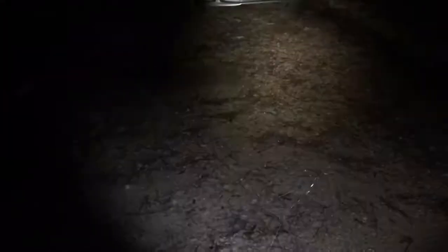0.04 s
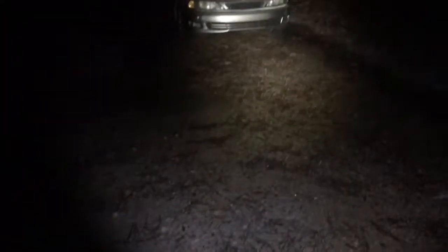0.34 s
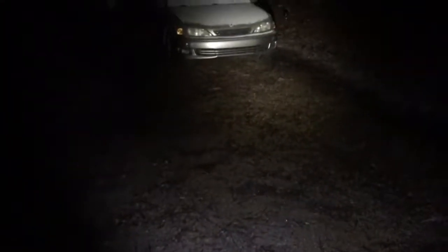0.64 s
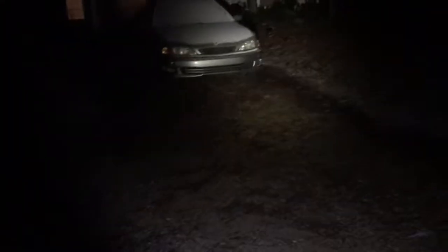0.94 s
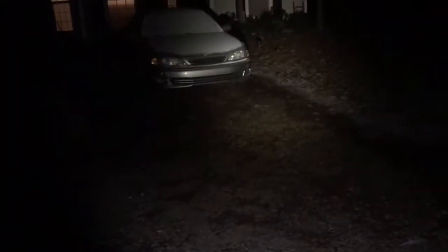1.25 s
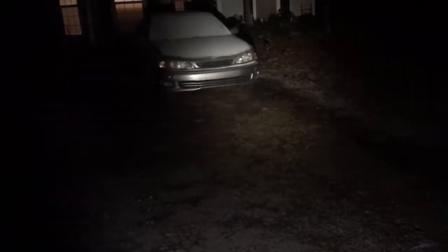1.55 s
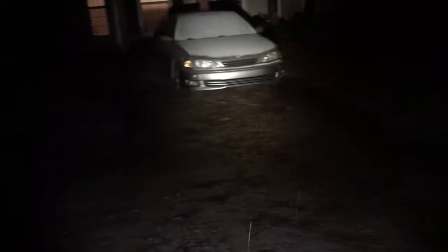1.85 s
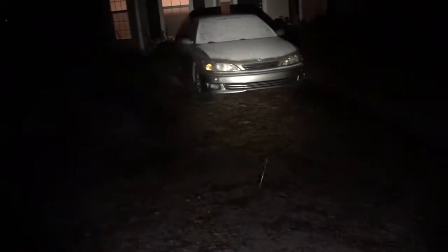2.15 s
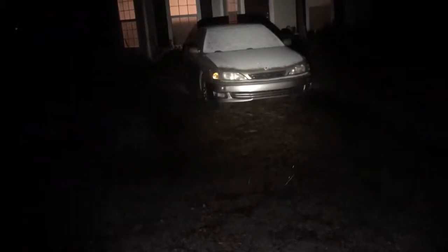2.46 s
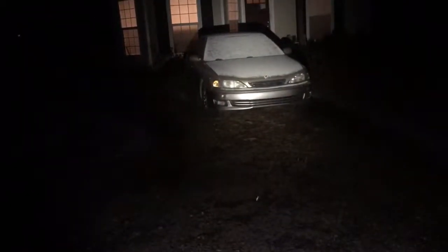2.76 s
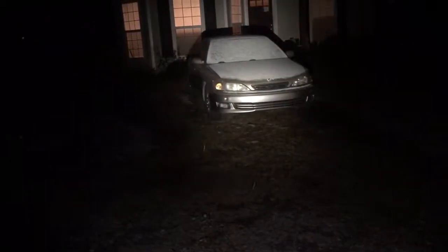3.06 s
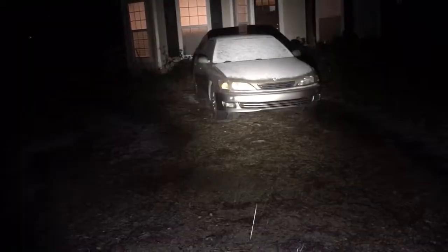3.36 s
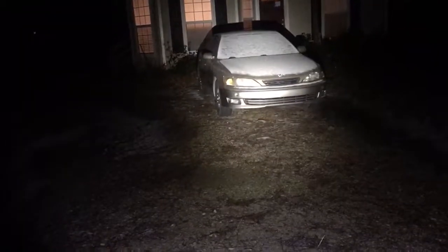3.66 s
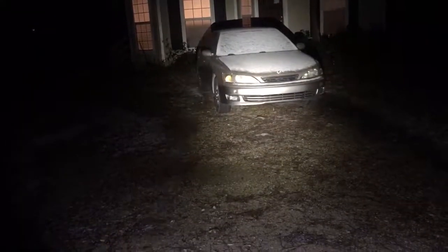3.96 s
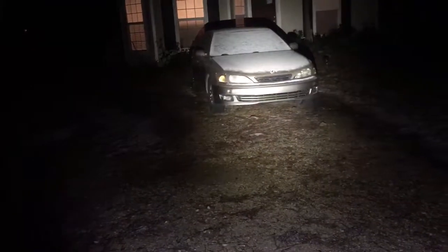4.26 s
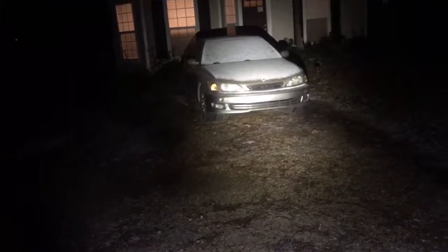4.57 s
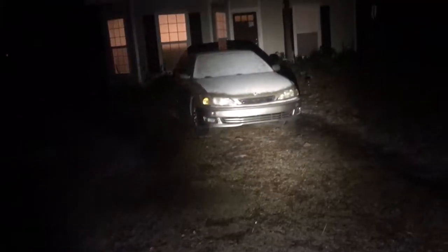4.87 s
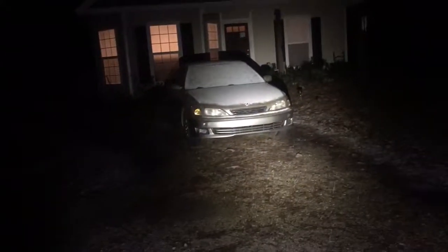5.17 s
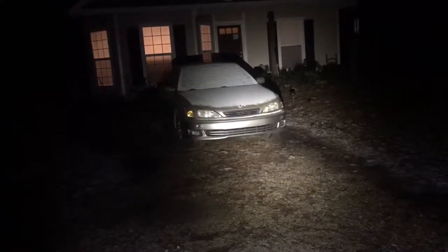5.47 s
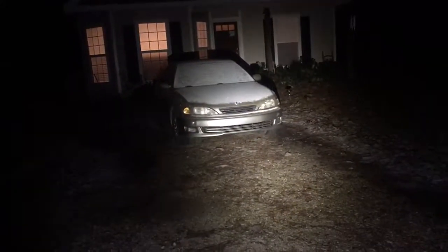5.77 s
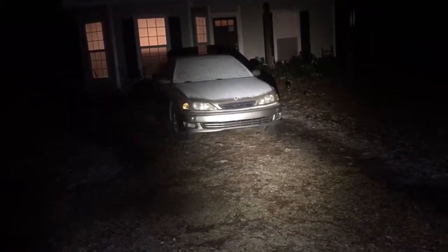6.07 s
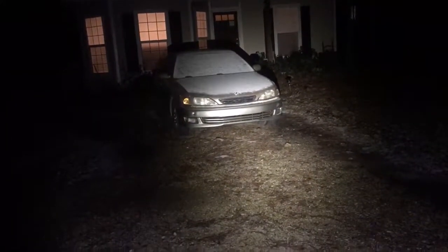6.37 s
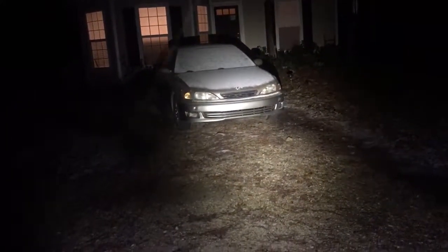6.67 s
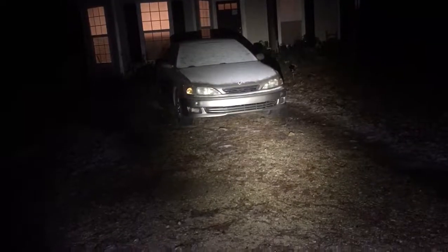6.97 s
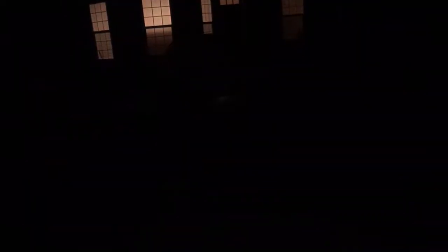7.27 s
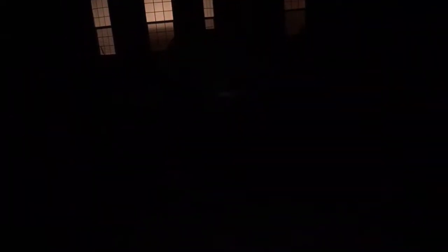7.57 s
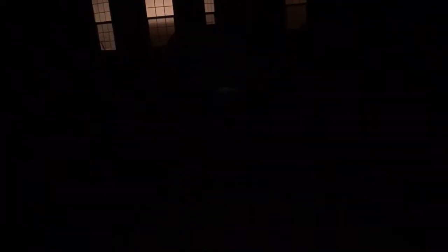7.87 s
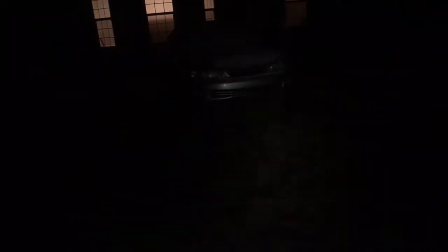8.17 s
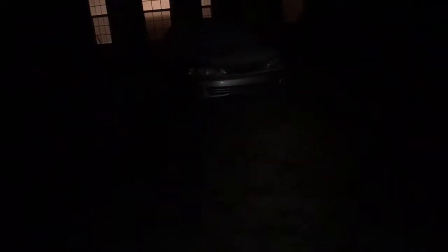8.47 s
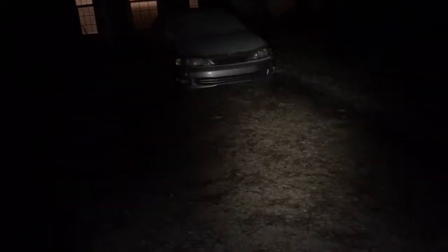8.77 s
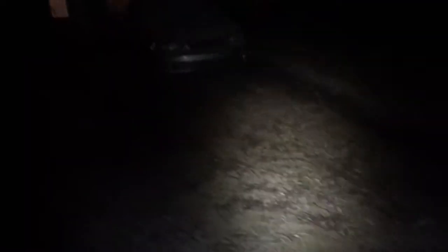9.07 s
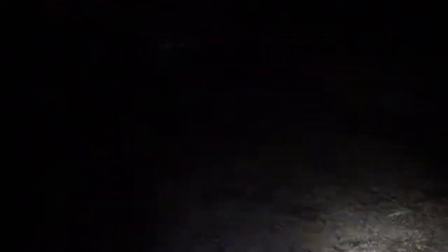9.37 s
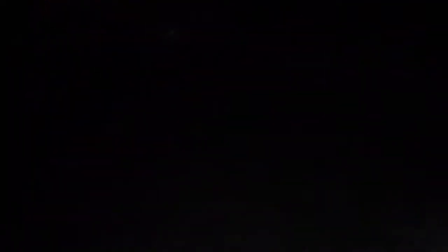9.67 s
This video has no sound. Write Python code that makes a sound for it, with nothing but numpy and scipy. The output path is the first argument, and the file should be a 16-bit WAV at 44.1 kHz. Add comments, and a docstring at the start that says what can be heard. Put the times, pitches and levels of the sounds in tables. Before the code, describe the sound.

Ice pellets patter outdoors in a bright, continuous hiss, over light wind and very faint distant traffic.

```python
"""A gravel drive and a lawn at night, under steady sleet.
Countless ice pellets merge into a bright sizzle. Nearer ones patter and tick, each a pressure swing
of a few cycles, and a few heavy drops pat dully on something soft close by. Eddies of light wind
rumble underneath, with a faint far drone of engines and tyres. The sound is mono."""
import sys
import numpy as np
from scipy import signal
from scipy.fft import rfft, irfft, next_fast_len
from scipy.io import wavfile

SR = 44100
rng = np.random.default_rng(int(sys.argv[2]) if len(sys.argv) > 2 else 0)


def store_pcm(level_fs):
    """Save levels as 16-bit WAV."""
    pcm = np.round(np.clip(level_fs, -1, 1) * 32767).astype(np.int16)
    wavfile.write(sys.argv[1], SR, np.atleast_2d(pcm).T)


N = 428652


def from_db(db):
    """Decibels to gain."""
    return 10 ** (np.asarray(db) / 20)


def unit_rms(x):
    """Scale to rms 1."""
    return x / np.sqrt(np.mean(x ** 2) + 1e-20)


def curve(rows):
    """Interpolate (seconds, value) rows to one value a sample."""
    return np.interp(np.arange(N) / SR, *np.transpose(rows))


def drift(rate_hz):
    """Smooth random motion, rms about 1."""
    hop, warmup = 40, 2000
    pole = np.exp(-2 * np.pi * hop * rate_hz / SR)
    noise = rng.standard_normal(N // hop + warmup + 2)
    slow = signal.lfilter([1], [1, -2 * pole, pole * pole], noise)[warmup:]
    return np.interp(np.arange(N) / hop, np.arange(len(slow)), unit_rms(slow))


def coloured(x, spectrum, notches=()):
    """Shape x with a minimum-phase filter; rms 1."""
    size = 2 * next_fast_len(N // 2 + 1)
    hz = np.maximum(np.fft.rfftfreq(size, 1 / SR), 1)
    points_hz, points_db = np.transpose(spectrum)
    db = np.interp(np.log(hz), np.log(points_hz), points_db)
    for centre_hz, width_hz, gain_db in notches:
        db += gain_db / (1 + (2 * (hz - centre_hz) / width_hz) ** 2)
    cepstrum = irfft(np.log(from_db(db)))
    response = np.exp(rfft(2 * cepstrum[:size // 2], size))
    return unit_rms(irfft(rfft(x, size) * response)[:N])


def impacts(rows):
    """Each impact is a pressure swing that swells and dies within a few cycles."""
    out, t = np.zeros(N), np.arange(SR // 20) / SR
    for start_s, db, hz, rise_cycles in rows:
        start = int(np.clip(start_s * SR, 0, N - 1))
        age = t * hz / max(rise_cycles, 0.1)
        envelope = age * np.exp(1 - np.minimum(age, 40))
        swing = -np.sin(2 * np.pi * hz * t) * envelope
        out[start:start + len(t)] += from_db(db) * swing[:N - start]
    return out


def spatter(rows, decay_s, band_hz):
    """Fragments fly from each impact: a noise burst that dies in milliseconds."""
    kicks = np.zeros(N)
    for start_s, db in rows:
        kicks[int(np.clip(start_s * SR, 0, N - 1))] += from_db(db)
    envelope = signal.lfilter([1], [1, -np.exp(-1 / (decay_s * SR))], kicks + 1e-18)
    band = signal.butter(2, band_hz, "band", fs=SR, output="sos")
    return envelope * unit_rms(signal.sosfilt(band, rng.standard_normal(N)))


# Far engine notes. Each row: peak time in seconds, level in dB, pitch in Hz, fade in seconds.
ENGINE_SWELLS = [(0.1, -60, 131, 0.46), (1.05, -55.5, 168.8, 0.22), (1.95, -53.5, 130.5, 0.76),
                 (3.6, -66, 171, 0.63), (5.0, -59.5, 130.7, 1.5), (8.15, -57.5, 168.5, 0.55),
                 (8.25, -57, 132, 0.23), (9.3, -62, 133.6, 0.71)]

def engines(t, waver_hz=1.99, throb_db=1.1):
    """Far engines swell and fade, wavering in pitch and level on their way through the air."""
    out = np.zeros(N)
    for peak_s, db, hz, fade_s in ENGINE_SWELLS:
        phase = 2 * np.pi * np.cumsum(hz + waver_hz * drift(4.9)) / SR
        note = unit_rms(np.sin(phase) * from_db(throb_db * drift(6.1)))
        out += from_db(db) * np.exp(-((t - peak_s) / fade_s) ** 2) * note
    return out


# Tyre noise spectrum. Each row: frequency in Hz, relative density in dB.
TYRE_SPECTRUM = [(88, -30.5), (150, -5), (220, -3.5), (310, -7.5), (405, -7), (520, -10), (660, -7.5),
                 (900, -13.5), (1300, -17), (1690, -19), (2860, -120)]
# Tyre noise over time. Each row: time in seconds, level in dB.
TYRE_LEVEL = [(0, -58.5), (1.8, -59), (4.7, -58), (6.5, -60.5), (8.7, -59.5), (9.2, -55.5), (9.72, -54)]

def tyres():
    """Tyres on a far road blend into a dull wash."""
    return from_db(curve(TYRE_LEVEL)) * coloured(rng.standard_normal(N), TYRE_SPECTRUM)


# Wind rumble spectrum. Each row: frequency in Hz, relative density in dB.
WIND_SPECTRUM = [(15, -42), (28, -21), (44, -1), (68, 1), (102, -6.5), (136, -4), (195, -16.5), (300, -23),
                 (420, -38), (660, -102)]
# Gusts. Each row: peak time in seconds, rise over the breeze in dB.
GUST_PEAKS = [(0.06, 9), (0.62, 7), (0.87, 3), (1.22, 10), (2.22, 9), (7.68, 11), (8.28, 10), (8.97, 5),
              (9.67, 8)]

def wind(t, breeze_db=-55.0, fresh_db=8.5, calming_s=1.63, lump_db=2.0, attack_s=0.037, release_s=0.03):
    """Eddies give a lumpy rumble that calms to a breeze; short gusts rise out of it."""
    gust_db = sum(db * np.exp(-np.maximum((peak_s - t) / attack_s, (t - peak_s) / release_s))
                  for peak_s, db in GUST_PEAKS)
    level_db = breeze_db + fresh_db * np.exp(-t / calming_s) + gust_db + lump_db * drift(7.7)
    return from_db(level_db) * coloured(rng.standard_normal(N), WIND_SPECTRUM)


def pellet_grains(per_band_per_s, spread_db, flutter_db, bands=9):
    """Dense pellet clicks, most weak, a few strong; each pitch band has its own flurries."""
    out, edges_hz = np.zeros(N), np.geomspace(2200, 16500, bands + 1)
    for band_hz in zip(edges_hz, edges_hz[1:]):
        hits = np.flatnonzero(rng.random(N) < per_band_per_s / SR)
        hit_db = spread_db * np.minimum(rng.exponential(1, len(hits)), 4)
        clicks = np.zeros(N)
        clicks[hits] = from_db(hit_db) * rng.choice([-1, 1], len(hits))
        band = signal.butter(1, band_hz, "band", fs=SR, output="sos")
        out += signal.sosfilt(band, unit_rms(clicks) + 1e-18) * from_db(flutter_db * drift(40))
    return unit_rms(out)


# Tone of the sleet sizzle as picked up, with a bright microphone resonance near 6.1 kHz.
# Each row: frequency in Hz, relative gain in dB.
SIZZLE_SPECTRUM = [(530, -40), (900, -25), (1330, -20), (2150, -13), (2670, -16.5), (4400, -7), (4840, -7),
                   (5590, 0), (6080, 1), (6530, 0), (7710, -9.5), (9450, -11.5), (10400, -15.5),
                   (15100, -18), (15600, -16)]
# Narrow dips in that tone. Each row: centre in Hz, width in Hz, gain in dB.
SIZZLE_NOTCHES = [(4950, 180, -4), (10310, 900, -3)]

def sizzle(t, start_db=-37.5, thinning_db_per_s=0.195, flurry_db=0.73, hiss_db=-1.5, grain_db=-3.5):
    """Far pellets blur into hiss, closer ones stay grains; the fall flurries and slowly thins."""
    grains = from_db(grain_db) * pellet_grains(per_band_per_s=1000, spread_db=3.5, flutter_db=0.97)
    hiss = from_db(hiss_db) * rng.standard_normal(N)
    level_db = start_db - thinning_db_per_s * t + flurry_db * drift(38)
    return from_db(level_db) * coloured(hiss + grains, SIZZLE_SPECTRUM, SIZZLE_NOTCHES)


def patter(per_s, level_db, spread_db, centre_hz, spread_octaves, rise_cycles, bunch_db):
    """Pellets hit one surface in loose bunches: ticks of varied size and pitch."""
    landed = np.cumsum(per_s * from_db(bunch_db * drift(6))) / SR
    jitter, size, pitch, ring = rng.uniform(-1, 1, (3000, 4)).T
    # A pellet lands when the running count reaches its turn.
    turn = np.arange(len(jitter)) + 2 * jitter
    start_s = np.interp(turn, landed, np.arange(N) / SR, left=-1, right=-1)
    db = level_db + spread_db * size
    hz = centre_hz * 2 ** (spread_octaves * pitch)
    cycles = rise_cycles * 2 ** (0.65 * ring)
    return impacts(np.transpose([start_s, db, hz, cycles])[start_s >= 0])


# Flurries a few steps away. Each row: time in seconds, base rate in pellets per second.
FALL_RATE = [(0, 72), (1.3, 63.2), (2.1, 19.8), (2.9, 26.5), (3.7, 73.8), (5.6, 108.3), (7.4, 52),
             (8.8, 49.8), (9.3, 83)]

def ground_patter(close_share=0.15, gravel_share=0.6, mud_share=0.25):
    """One rate of fall drives the patter on every surface."""
    per_s = curve(FALL_RATE)
    underfoot = patter(close_share * per_s, level_db=-32.5, spread_db=3.0,
                       centre_hz=2220, spread_octaves=0.34, rise_cycles=0.32, bunch_db=4.5)
    lawn = patter(per_s, level_db=-42.5, spread_db=11.0,
                  centre_hz=2110, spread_octaves=0.74, rise_cycles=0.32, bunch_db=3.5)
    gravel = patter(gravel_share * per_s, level_db=-34.0, spread_db=8.5,
                    centre_hz=4970, spread_octaves=0.5, rise_cycles=0.46, bunch_db=3)
    mud = patter(mud_share * per_s, level_db=-52.5, spread_db=5.5,
                 centre_hz=393, spread_octaves=0.73, rise_cycles=0.56, bunch_db=1.5)
    return underfoot + lawn + gravel + mud


# Heavy drops on something soft. Each row: start in seconds, pat level before trim in dB,
# pat pitch in Hz, splat level in dB, thud level in dB, thud pitch in Hz.
DROP_HITS = [(0.529, -25, 546, -36, -38, 120), (1.152, -27, 990, -47, -35.5, 183),
             (2.4933, -30.5, 620, -34.5, -53, 170), (2.6128, -43, 820, -40.5, -37.5, 242),
             (3.5664, -36, 554, -48, -46, 160), (3.7529, -35, 422, -39, -53, 170),
             (8.9409, -29, 770, -36.5, -38, 75), (9.3478, -38, 714, -42, -40, 291)]

def heavy_drops(pat_trim_db=-2.0, snap_over_splat_db=10.0, snap_hz=3200, thud_delay_s=0.00396):
    """A snap of ice, a wet splat, a hollow pat, then a low thud as the surface gives."""
    splats, snaps, pats, thuds = [], [], [], []
    for start_s, pat_db, pat_hz, splat_db, thud_db, thud_hz in DROP_HITS:
        splats.append((start_s, splat_db))
        snaps.append((start_s, splat_db + snap_over_splat_db, snap_hz, 0.3))
        pats.append((start_s, pat_db + pat_trim_db, pat_hz, 0.69))
        thuds.append((start_s + thud_delay_s, thud_db, thud_hz, 0.38))
    return spatter(splats, decay_s=0.0041, band_hz=(460, 2300)) + impacts(snaps + pats + thuds)


# The hardest, nearest pellets. Each row: start in seconds, level in dB, pitch in Hz, rise in cycles.
PELLET_HITS = [(0.1778, -26, 1820, 0.31), (0.1864, -27.5, 3260, 0.15), (0.2841, -26, 1820, 0.31),
               (0.548, -25, 2580, 0.36), (0.8328, -29.5, 1290, 0.26), (0.9872, -28.5, 1440, 0.39),
               (1.0119, -25, 2280, 0.39), (1.107, -29.5, 1690, 0.41), (1.6213, -25.4, 2030, 0.34),
               (1.8143, -25, 2580, 0.18), (2.6065, -27.5, 3260, 0.31), (3.2351, -28.5, 1830, 0.4),
               (3.4462, -22.5, 2500, 0.27), (3.744, -28.5, 1540, 0.48), (3.7949, -24, 2290, 0.35),
               (3.989, -25, 2290, 0.27), (3.9963, -28, 6000, 1.2), (4.2585, -20.5, 3260, 0.16),
               (4.3095, -21.5, 1860, 0.36), (4.5725, -26, 2020, 0.33), (4.8485, -24.5, 4500, 0.82),
               (4.8985, -26, 2580, 0.18), (5.0922, -30, 2260, 0.55), (5.2805, -30, 1330, 0.38),
               (5.2897, -21, 5260, 0.72), (5.458, -20.5, 2580, 0.17), (5.6226, -26, 2290, 0.48),
               (5.849, -26, 1600, 0.36), (5.925, -25.5, 2580, 0.31), (6.258, -28, 1500, 0.3),
               (6.4408, -26, 2290, 0.2), (6.6002, -27, 1830, 0.36), (6.7516, -27.5, 2076, 0.32),
               (6.9475, -32.5, 2960, 1.6), (7.1106, -30, 1820, 0.35), (7.1183, -28.5, 2040, 0.45),
               (7.226, -26.5, 2580, 0.22), (8.054, -24, 6100, 1.1), (8.5212, -27, 1620, 0.3),
               (9.2006, -24.7, 2900, 0.35), (9.2235, -25, 2290, 0.39), (9.2698, -27.5, 2030, 0.92),
               (9.3457, -32, 1820, 0.16), (9.5902, -27, 2580, 0.24)]

def near_pellets(push_gain_db=-20.5, push_hz=800, shatter_gain_db=-13.5):
    """Each lands with a dry snap, a soft push on the ground and a trace of shattering ice."""
    pushes = [(start_s, db + push_gain_db, push_hz, 0.25) for start_s, db, _, _ in PELLET_HITS]
    shards = [(start_s, db + shatter_gain_db) for start_s, db, _, _ in PELLET_HITS]
    shatter = spatter(shards, decay_s=0.0052, band_hz=(1490, 5500))
    return impacts(PELLET_HITS) + impacts(pushes) + shatter


def scene():
    """Open air without echo, alike in both channels."""
    t = np.arange(N) / SR
    sleet = ground_patter() + sizzle(t) + near_pellets() + heavy_drops()
    background = wind(t) + engines(t) + tyres()
    return np.tile(sleet + background, (2, 1))


def record(dry, cutoff_hz=15750):
    """Steep low-pass."""
    return signal.sosfilt(signal.ellip(12, 0.1, 80, cutoff_hz, fs=SR, output="sos"), dry)


dry = scene()
out = record(dry)
store_pcm(out)
```